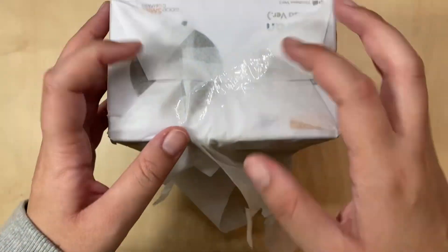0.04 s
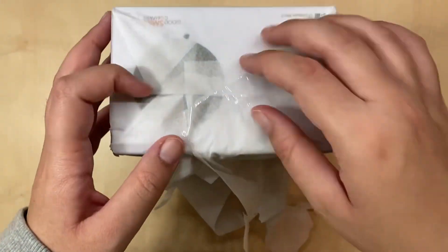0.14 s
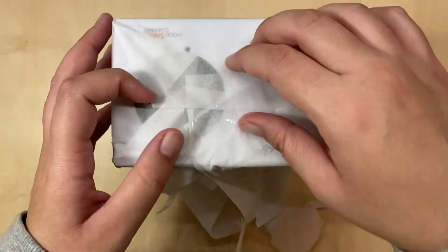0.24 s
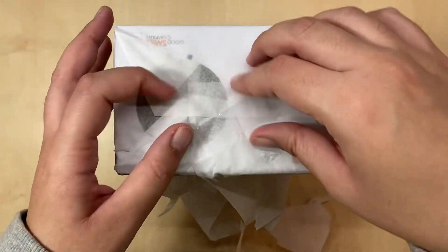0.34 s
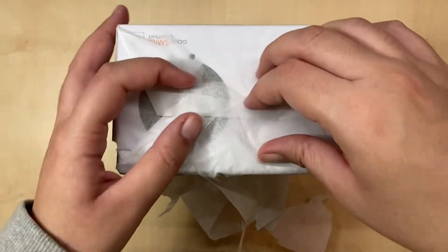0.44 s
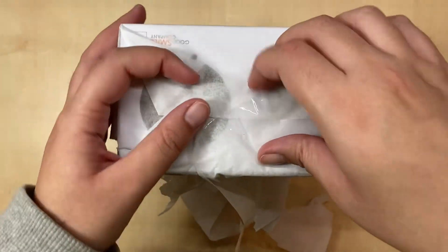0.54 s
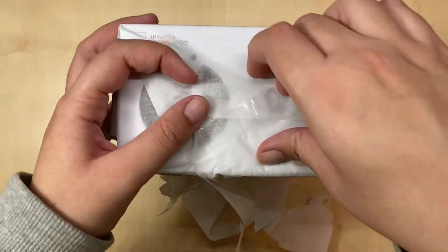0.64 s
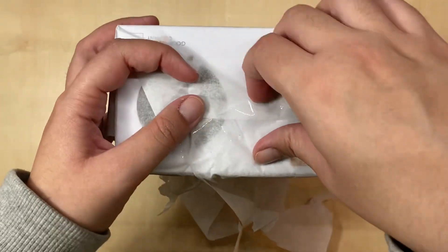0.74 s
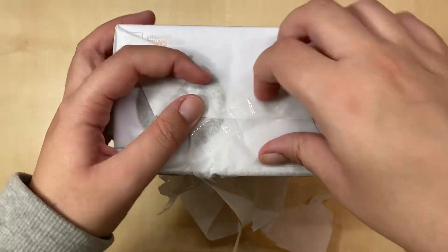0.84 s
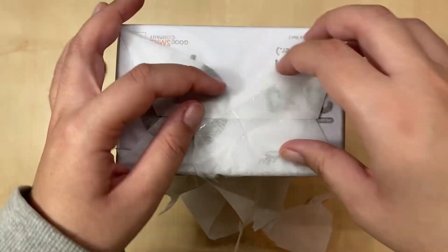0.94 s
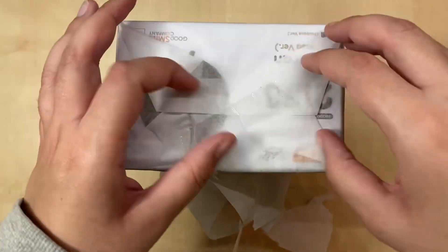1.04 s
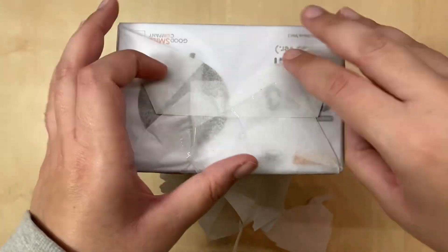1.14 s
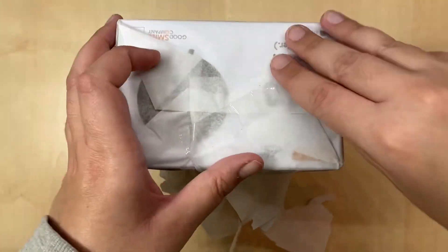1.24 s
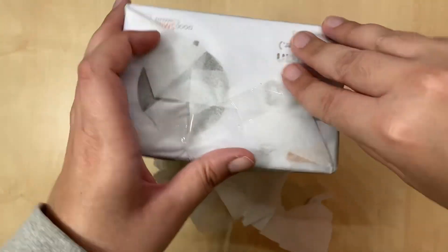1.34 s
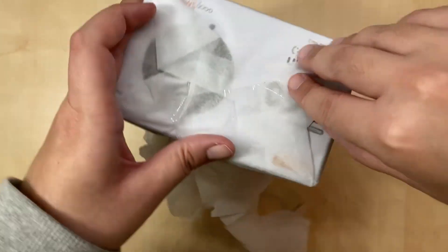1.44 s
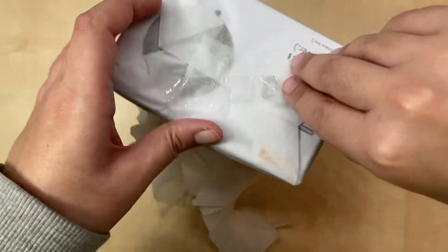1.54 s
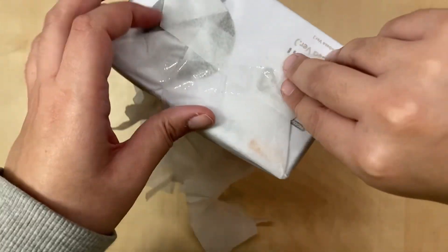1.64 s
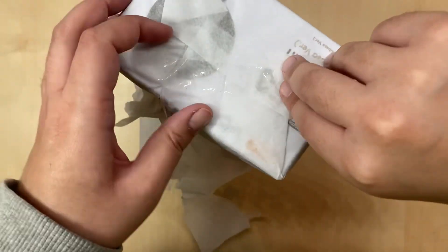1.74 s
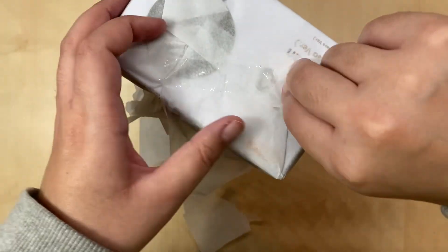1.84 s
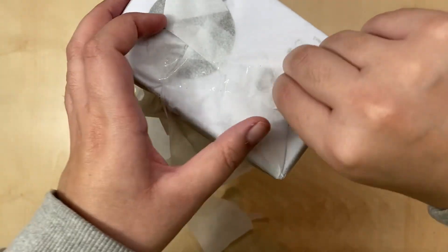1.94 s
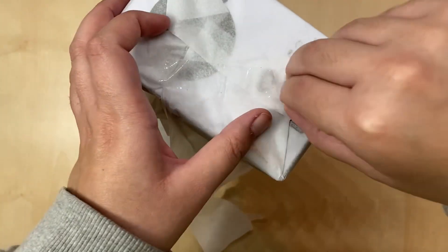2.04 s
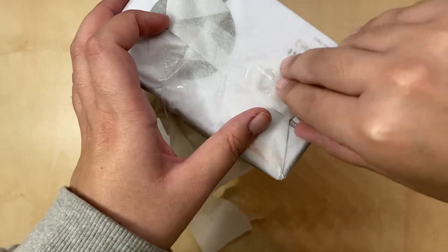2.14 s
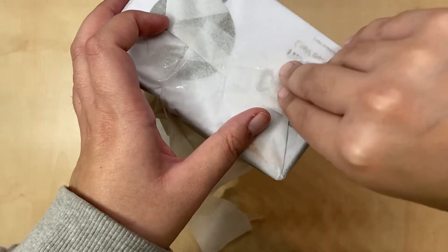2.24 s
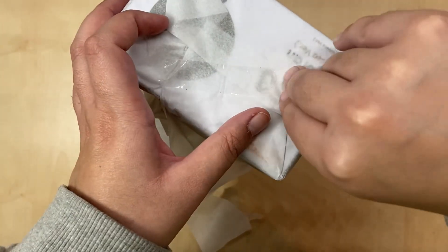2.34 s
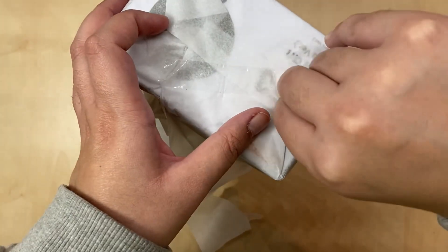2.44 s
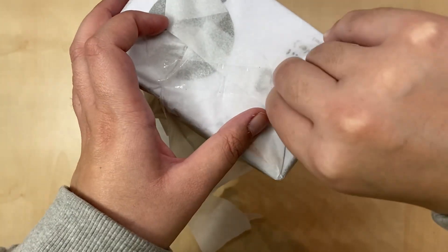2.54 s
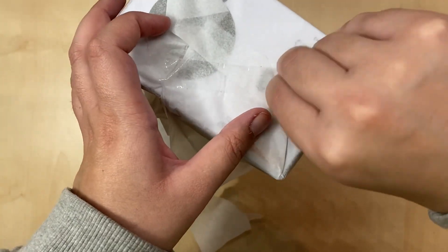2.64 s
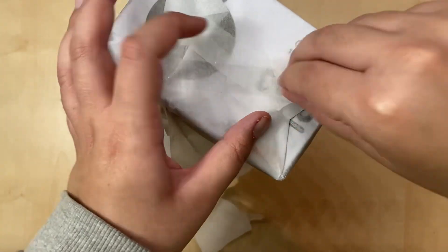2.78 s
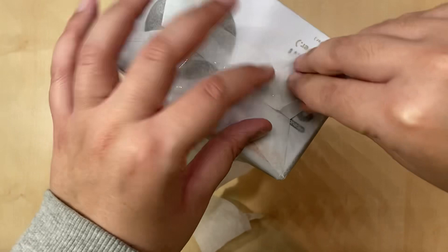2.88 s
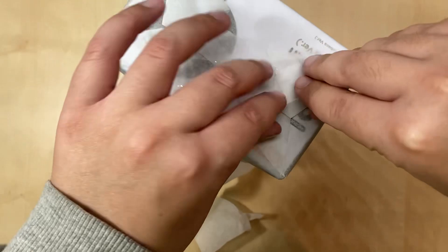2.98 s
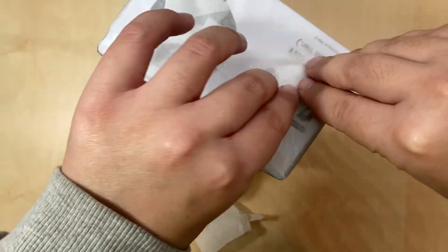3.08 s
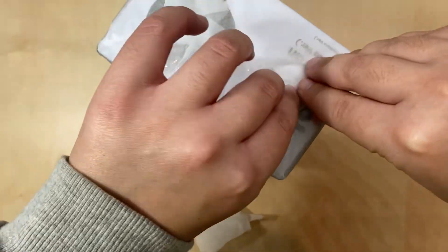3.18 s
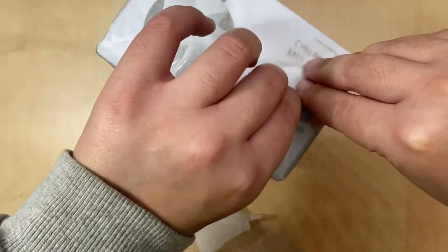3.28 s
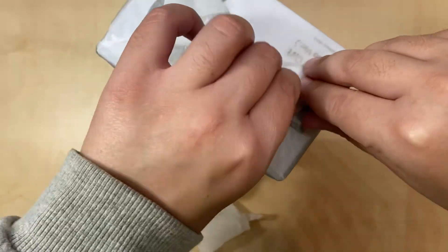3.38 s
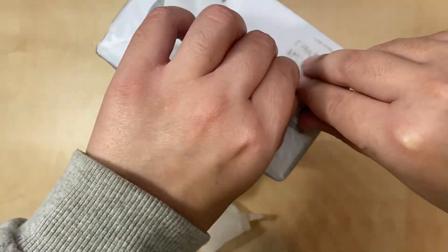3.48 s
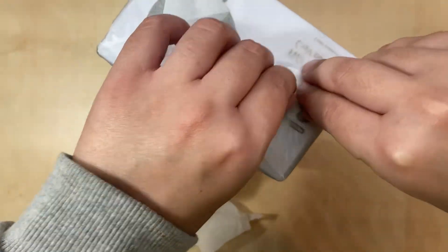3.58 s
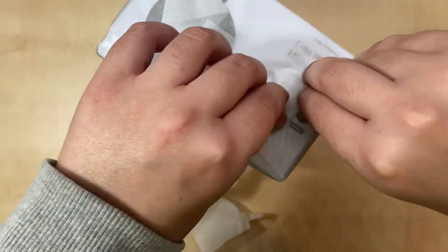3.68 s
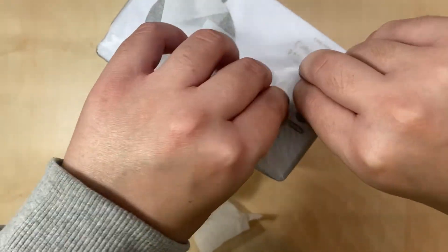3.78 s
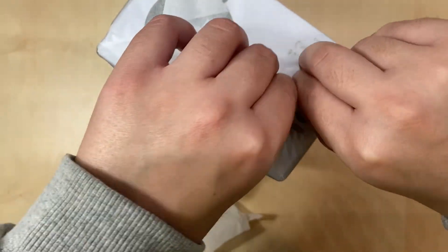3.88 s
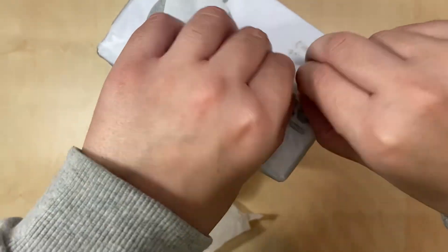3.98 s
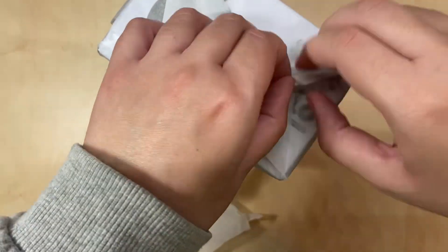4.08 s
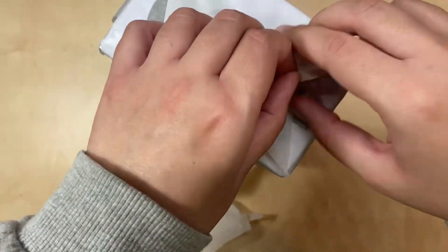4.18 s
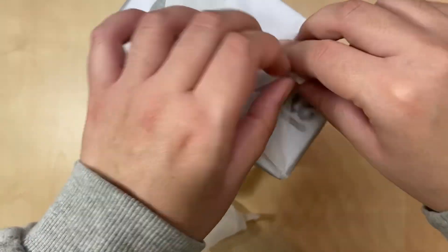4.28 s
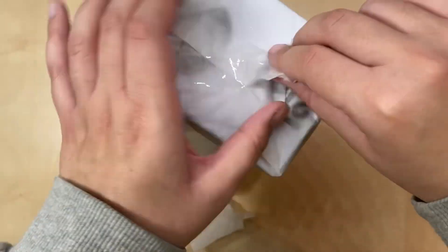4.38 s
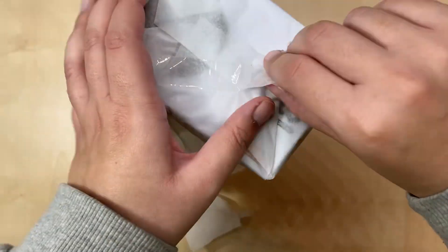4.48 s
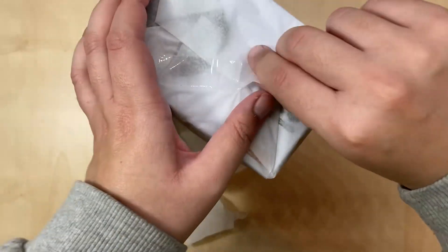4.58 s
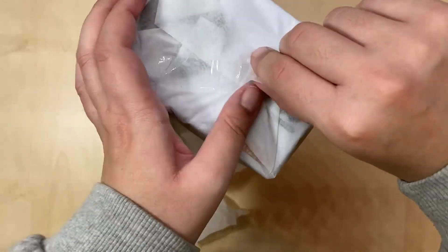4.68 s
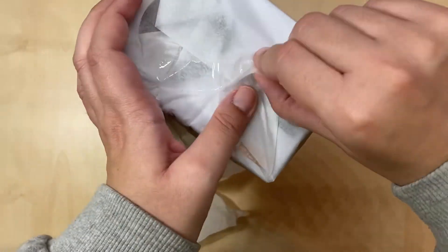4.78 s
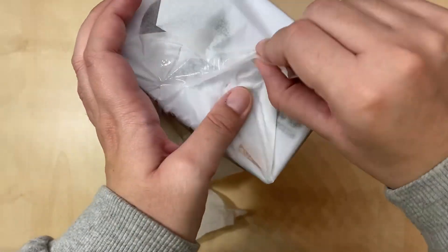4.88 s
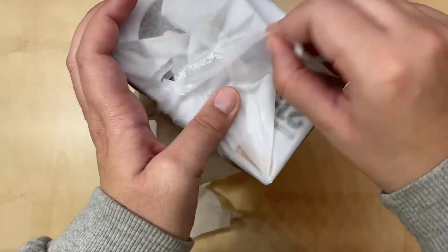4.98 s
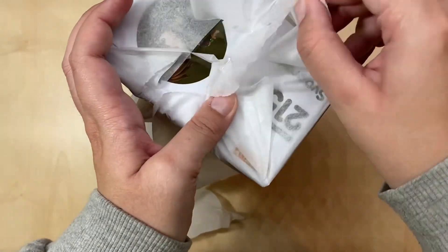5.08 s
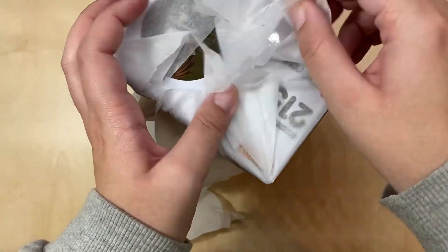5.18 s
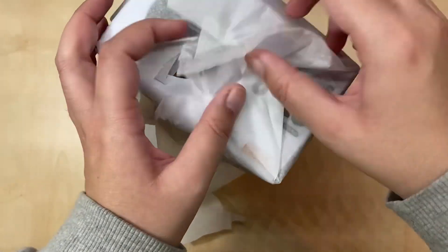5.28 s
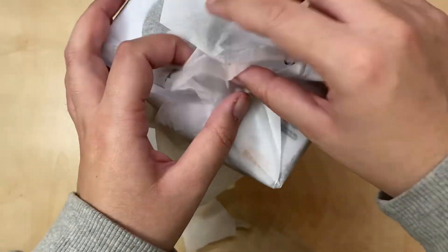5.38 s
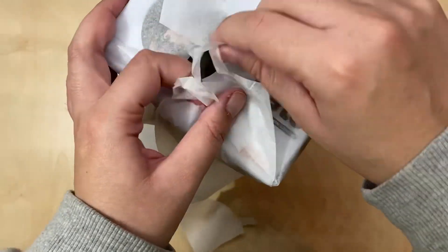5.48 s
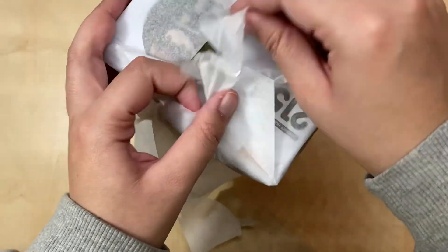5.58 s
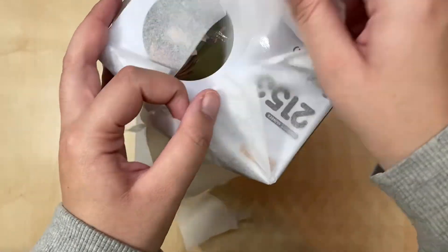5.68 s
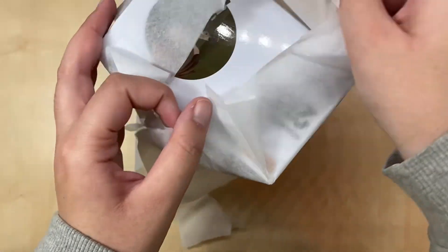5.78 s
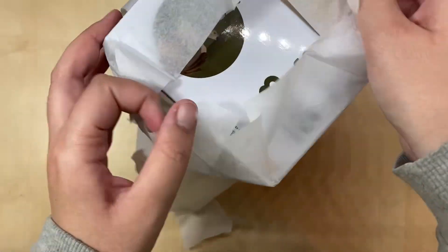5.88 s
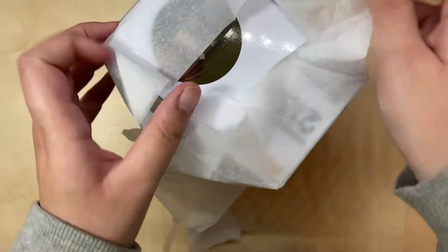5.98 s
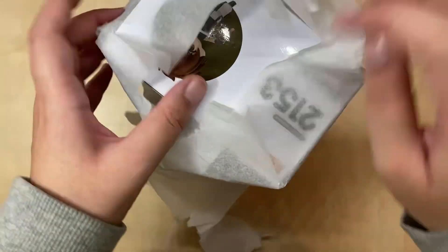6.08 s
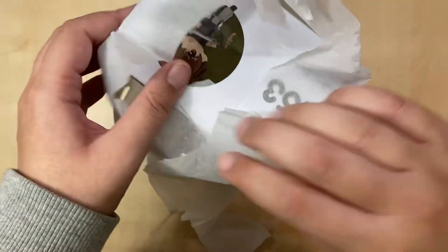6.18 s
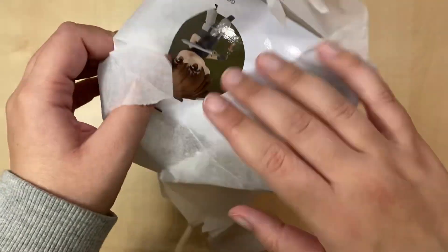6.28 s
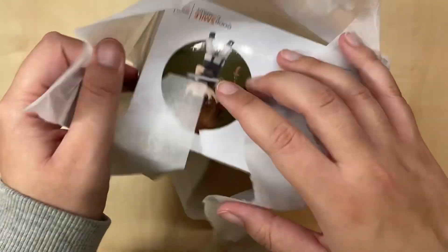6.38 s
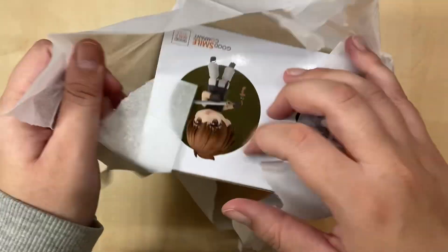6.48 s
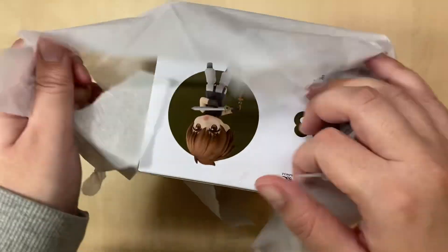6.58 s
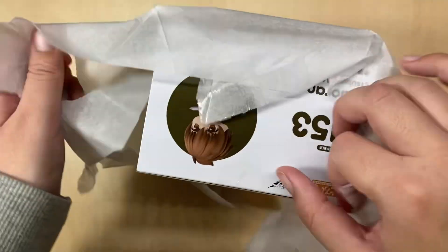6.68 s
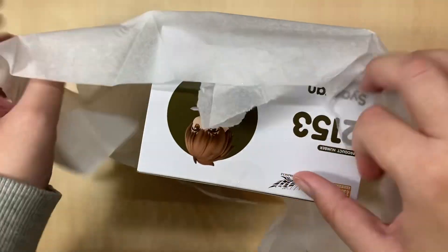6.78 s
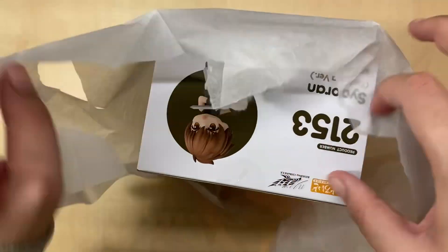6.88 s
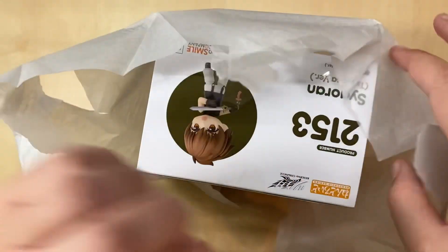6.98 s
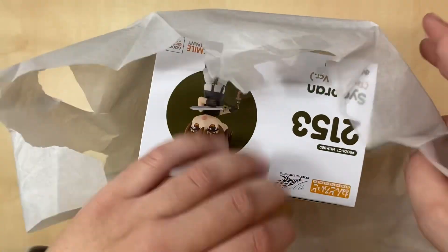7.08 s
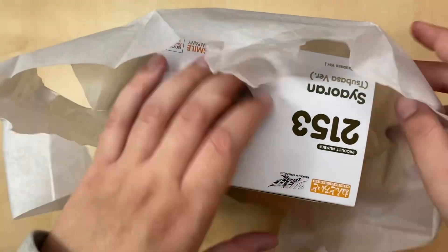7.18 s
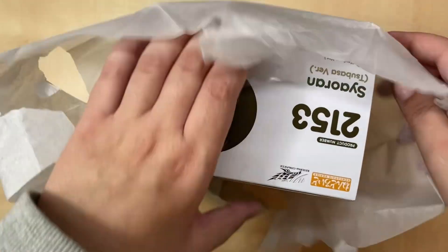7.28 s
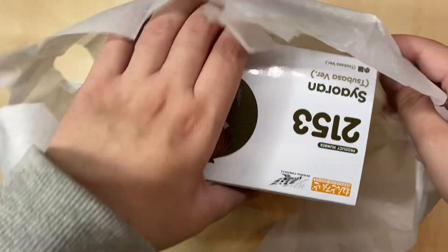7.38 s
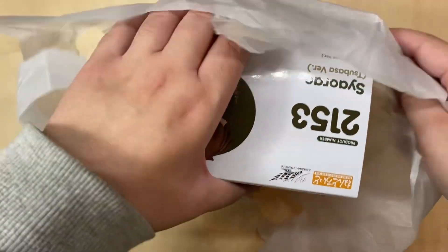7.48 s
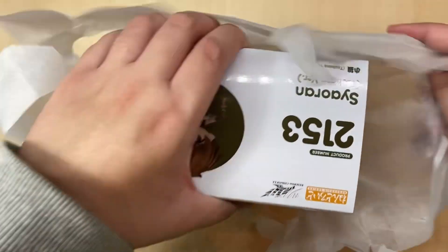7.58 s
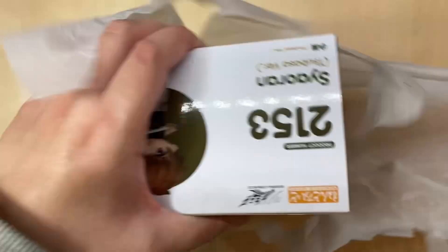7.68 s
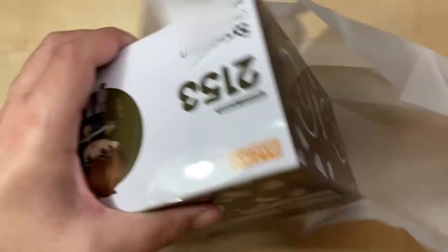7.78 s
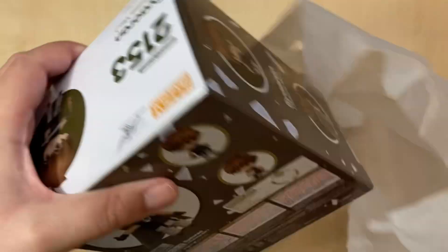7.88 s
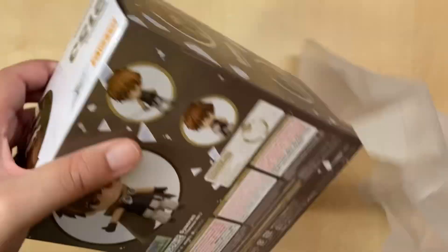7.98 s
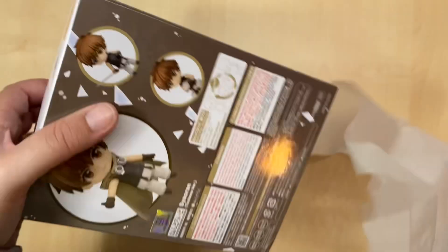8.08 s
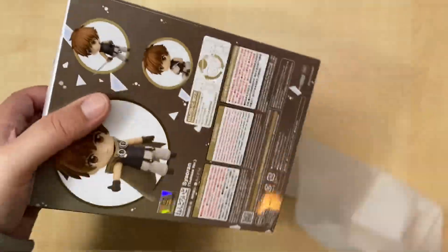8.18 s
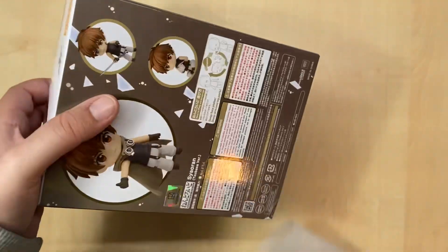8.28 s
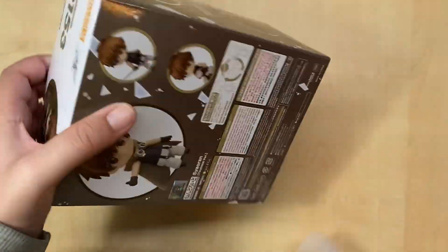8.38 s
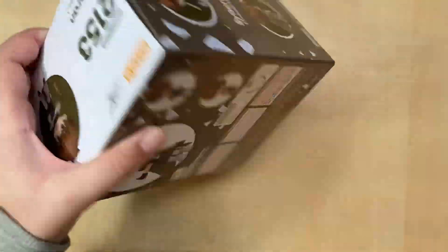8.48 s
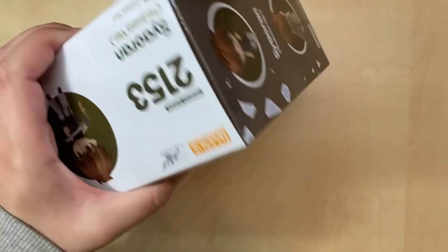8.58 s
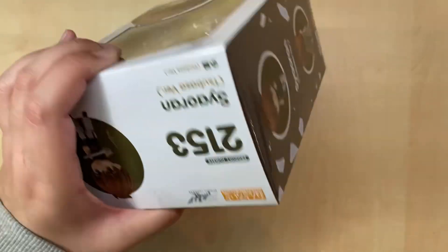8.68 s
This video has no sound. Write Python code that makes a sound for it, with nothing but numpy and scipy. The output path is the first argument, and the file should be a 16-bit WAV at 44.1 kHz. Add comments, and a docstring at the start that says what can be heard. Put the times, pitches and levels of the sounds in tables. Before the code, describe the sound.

Close up on a table in a small, fairly dry room, hands pick at thin paper and tape around a light cardboard box. Small snaps and hollow knocks come first, then quieter fiddling. Sudden hard snaps and a bright rip follow, then continuous tearing and crumpling, growing louder, ending with box knocks and dull table thumps. Stereo handheld microphone, very near.

```python
"""Hands pick at tape and paper with light snaps and knocks, ease off from about 2 s, then rip from 4.4 s.
Hard snaps crowd in just before 5 s; crumpling swells after 6.5 s, with box knocks and table thumps near the end.
Paper is noise shaped by crease bursts, pulls and snaps, plus ringing pops; box and table are struck or
rubbed modes. Room tone and a short tail lie below; two close ports of a handheld recorder pick it all up."""
import sys
import numpy as np
from scipy import signal
from scipy.fft import rfft, irfft, next_fast_len
from scipy.io import wavfile
from scipy.ndimage import uniform_filter1d

SR = 44100
rng = np.random.default_rng(int(sys.argv[2]) if len(sys.argv) > 2 else 0)


def inscribe(sig):
    """Save sig as 16-bit PCM at rate SR to the path in sys.argv[1].

    A 1-D sig is mono; a 2-D sig holds one channel per row.
    Samples are clipped to [-1, 1] before scaling.
    """
    pcm = np.round(np.clip(np.atleast_2d(sig).T, -1, 1) * 32767)
    wavfile.write(sys.argv[1], SR, pcm.astype(np.int16))


N = 384993


def amp(db):
    """Amplitude from dB."""
    return 10 ** (np.asarray(db) / 20)


def rms_one(x):
    """Scale to rms 1."""
    return x / np.sqrt(np.mean(x ** 2) + 1e-20)


def evened(x):
    """Hold the running rms over 1/8 s at 1."""
    return x / np.sqrt(uniform_filter1d(x ** 2, size=SR // 8) + 1e-12)


def in_time(rows):
    """Interpolate each column of a table over t, per sample."""
    s, *columns = np.transpose(rows)
    return [np.interp(np.arange(N) / SR, s, column) for column in columns]


def at_hz(points, hz):
    """Interpolate a two-column table over log frequency."""
    table_hz, values = np.transpose(points)
    return np.interp(np.log(hz), np.log(table_hz), values)


def bins_hz(size):
    """Frequencies of the rfft bins, at least 1 Hz."""
    return np.maximum(np.arange(size // 2 + 1) * SR / size, 1)


def highpass(x, hz):
    """Second-order Butterworth high-pass."""
    return signal.sosfilt(signal.butter(2, hz, "high", fs=SR, output="sos"), x)


def decayed(x, ms):
    """Exponential decay with time constant ms after each impulse."""
    return signal.lfilter([1], [1, -np.exp(-1000 / (ms * SR))], x + 1e-18)


def delayed(paths, late):
    """Read each path at fractional sample positions."""
    return np.array([np.interp(late, np.arange(N), path) for path in paths])


def coloured(x, spectrum):
    """Filter by a (f/Hz, gain/dB) table."""
    size = next_fast_len(N + 4096)
    return irfft(rfft(x, size) * amp(at_hz(spectrum, bins_hz(size))), size)[..., :N]


def drift(corner_hz):
    """Slow random signal of rms 1: noise through a double pole."""
    r = np.exp(-2 * np.pi * corner_hz / SR)
    noise = rng.standard_normal(N + SR)
    return rms_one(signal.lfilter([1], [1, -2 * r, r * r], noise)[SR:])


def ring(force, modes):
    """A force drives two-pole modes; panels radiate little below their lowest mode."""
    out = 0
    for hz, level_db, t60_s in modes:
        r, w = amp(-60 / (t60_s * SR)), 2 * np.pi * hz / SR
        b, a = [0, amp(level_db) * np.sin(w)], [1, -2 * r * np.cos(w), r * r]
        out = out + signal.lfilter(b, a, force + 1e-18)
    return highpass(out, 0.46 * modes[0][0])


def strokes(steady_db, start_s, length_s, level_db, swell_db, rise_db_per_s, fall_db_per_s):
    """Level/dB of strokes that rise, swell or sag, then fall; powers add to a steady level."""
    start, length, level, swell = (np.asarray(x)[:, None] for x in (start_s, length_s, level_db, swell_db))
    t = np.arange(0, N + 64, 32) / SR
    held_db = swell * np.clip((t - start) / length, 0, 1)
    before_db = np.maximum(rise_db_per_s * (start - t), 0)
    after_db = np.maximum(fall_db_per_s * (t - start - length), 0)
    power = np.sum(amp(2 * (level + held_db - before_db - after_db)), axis=0)
    power = np.interp(np.arange(N) / SR, t, power)
    return 10 * np.log10(power + amp(2 * steady_db))


# room tone spectrum: f/Hz, relative level per Hz/dB
AIR_SPECTRUM = [(20, -38), (45, 37.5), (80, 31.5), (200, -35), (600, -26), (2000, -65)]
AIR_DB = -61.5


def air():
    """Room tone: steady coloured noise, independent in three paths."""
    return amp(AIR_DB) * rms_one(coloured(rng.standard_normal((3, N)), AIR_SPECTRUM))


ROOM_T60_S, ROOM_DB = 0.16, -10.5


def room(x):
    """Short reverberation: each path convolved with its own decaying noise tail."""
    t = np.arange(SR // 2) / SR
    tail = rng.standard_normal((3, len(t))) * amp(-60 * t / ROOM_T60_S) * (t > .006)
    tail = signal.lfilter([1], [1, -.6], tail)
    tail = tail / np.sqrt(np.sum(tail ** 2, 1, keepdims=True))
    return amp(ROOM_DB) * signal.fftconvolve(x, tail, axes=1)[:, :N]


# hand activity, as steady rustle: t/s, level/dB
HANDS_LEVEL = [(0, -45.5), (.3, -58), (.78, -52.5), (1.15, -56.5), (1.6, -50), (1.95, -55.5), (2.5, -57.5),
               (2.95, -62.5), (3.45, -65), (3.96, -63), (4.1, -55), (4.7, -41), (5.15, -40.5), (6.1, -40.5),
               (6.6, -34.5), (6.82, -40), (7.0, -41), (7.5, -37.5), (8.0, -32), (8.73, -32)]


def hands():
    """Level/dB of the rustle that never stops."""
    return in_time(HANDS_LEVEL)[0]


GRIP_DETUNE_SHARE, GRIP_DB = 0.042, 4   # changing grip shifts the pitch of struck modes, mutes rubbed ones


def rubbed(modes, level_db, rough_db):
    """Uneven friction drives the modes, each coming and going with the grip."""
    force = rng.standard_normal((3, N)) * amp(rough_db * drift(34))
    driven = 0
    for mode in modes:
        grip_db = GRIP_DB * np.tanh(drift(3.5))
        driven = driven + ring(amp(level_db + grip_db) * force, [mode])
    return driven / np.std(ring(force[0], modes))


# box panels, stiff box edges, table top; each: f/Hz, relative level/dB, free t60/s
BOX_MODES = [(300, -7, 0.04), (352, -3, 0.05), (398, 2, 0.06), (482, -15, 0.015), (558, -15, 0.05)]
EDGE_MODES = [(826, -5, 0.015), (1038, 5, 0.047), (1316, 7.5, 0.017), (1720, 8.5, 0.015), (2300, 6, 0.014)]
TABLE_MODES = [(60, -11, .05), (88, -10, .06), (118.5, 0, .23)]
# box shoved or pressed on the table: start t/s, length/s, box level/dB, table level/dB
SHOVE_STROKES = [(0.189, 0.017, -45.5, -55), (0.37, 0.09, -50.5, -66), (0.458, 0.074, -48, -50),
                 (0.69, 0.021, -44.5, -66), (1.22, 0.16, -60.5, -61), (2.248, 0.37, -61.5, -54.5),
                 (3.039, 0.3, -58.5, -64.5), (3.51, 0.081, -55, -64), (3.692, 0.26, -57, -63),
                 (4.027, 0.27, -55.5, -77), (4.252, 0.063, -47.5, -72), (4.766, 0.042, -45.5, -47),
                 (4.865, 0.11, -49, -52), (4.96, 0.1, -42, -59), (5.36, 0.041, -50, -71),
                 (5.693, 0.0086, -41.5, -51), (6.33, 0.15, -48, -45.5), (6.935, 0.017, -49, -47.5),
                 (7.545, 0.13, -53, -44.5), (7.94, 0.071, -72, -46), (8.104, 0.13, -50, -45),
                 (8.438, 0.029, -35.5, -41), (8.56, 0.13, -73, -51)]
SHOVE_RISE_DB_PER_S, SHOVE_FALL_DB_PER_S = 400, 252
# faint steady motion: levels with the hands at -50 dB, share of the hands' swing in dB
BOX_STIR_DB, TABLE_STIR_DB, STIR_FOLLOWS = -61, -62.5, 0.67
EDGES_RE_BOX_DB = -9.5
PRESSED_RING_SHARE = .45   # share of free t60 left under the weight of the hands


def shoves():
    """Friction rings box, edges and table, faintly all along and harder in each shove."""
    start_s, length_s, box_stroke_db, table_stroke_db = np.transpose(SHOVE_STROKES)
    stir_db = STIR_FOLLOWS * (hands() + 50)
    flat_db = np.zeros_like(start_s)
    rates = SHOVE_RISE_DB_PER_S, SHOVE_FALL_DB_PER_S
    box_db = strokes(BOX_STIR_DB + stir_db, start_s, length_s, box_stroke_db, flat_db, *rates)
    table_db = strokes(TABLE_STIR_DB + stir_db, start_s, length_s, table_stroke_db, flat_db, *rates)
    pressed_table = [(hz, db, t60_s * PRESSED_RING_SHARE) for hz, db, t60_s in TABLE_MODES]
    box = rubbed(BOX_MODES, box_db, rough_db=4.0)
    edges = rubbed(EDGE_MODES, box_db + EDGES_RE_BOX_DB, rough_db=-0.5)
    return box + edges + rubbed(pressed_table, table_db, rough_db=6.0)


# fingers and box corners: t/s, level/dB, table re level/dB, edges re level/dB; each part trimmed in knocks()
KNOCK_HITS = [(0.058, -27, -15, -22), (0.186, -33, -2, -19), (0.191, -28, -12, -10),
              (0.374, -34, -27, -16.5), (0.445, -28, -26, -44), (0.46, -36.5, -6, -14),
              (0.478, -34, -2, -34), (0.494, -43, -3, -8.5), (0.509, -29.5, -24, -35),
              (0.527, -42, -18, -9), (0.648, -21.5, -24, -23.5), (0.702, -24, -42, -15.5),
              (0.735, -29, -35, -37), (1.09, -35.5, -28, -24), (1.107, -45, -17, -4),
              (1.264, -30, -17, -31), (2.119, -39.5, -36, -23), (2.392, -37, -26, -13.5),
              (3.501, -46, -12, -17), (3.689, -38.5, -11, -28), (4.755, -30, -22, -38),
              (4.766, -21, -22, -42), (4.82, -40, 8, -25), (4.864, -24, -14, -24), (4.879, -41, 11, -25),
              (4.931, -42, -10, -8), (4.967, -33, -18, -13), (4.983, -31, 3.5, -15), (5.354, -39, -18, -32),
              (5.39, -45, -21, -30), (5.629, -36, -10, -24), (5.749, -23, -25, -15),
              (5.779, -25.5, -17, -12), (5.897, -34, -14, -22), (6.317, -28, -24, -26),
              (6.487, -28, -16, -16), (7.333, -28, -24, -36), (7.555, -42, -4, -15), (7.967, -47, 7, -27),
              (8.026, -40, -11, -24), (8.102, -34, 0, -19), (8.133, -43, 10, -23), (8.219, -25, -3, -12),
              (8.249, -38.5, 10, -23), (8.304, -43.5, 9.5, -14), (8.383, -41, 7, -9),
              (8.438, -22.5, -3, -18), (8.4456, -33.5, 16.5, -20), (8.671, -50, 12, -23)]
HELD_RING_SHARE = 0.99   # share of free t60 left to a box held in the fingers


def struck(modes, start_s, level_db, contact_ms, vary_db, held):
    """Each hit rings decaying sines of varied strength, smoothed by contact time; held modes also detune."""
    t = np.arange(SR // 4) / SR
    hz, mode_db, t60_s = np.transpose(modes)[:, :, None]
    decay_db = -60 * t / (t60_s * (HELD_RING_SHARE if held else 1))
    rung = np.zeros(N + len(t))
    chance = rng.standard_normal((len(start_s), 2, len(modes), 1))
    for start, hit_db, (strength, tuning) in zip((start_s * SR).astype(int), level_db, chance):
        tuned_hz = hz * (1 + held * GRIP_DETUNE_SHARE * tuning)
        size = amp(hit_db + mode_db + vary_db * strength + decay_db)
        rung[start:start + len(t)] += np.sum(size * np.sin(2 * np.pi * tuned_hz * t), axis=0)
    contact = np.hanning(round(contact_ms * SR / 1000) + 3)
    rung = signal.lfilter(contact / contact.sum(), [1], rung[:N])
    return highpass(rung, 0.9 * modes[0][0])


def knocks():
    """Each knock pushes box, edges and table; the table is loaded most slowly."""
    s, level_db, table_db, edge_db = np.transpose(KNOCK_HITS)
    box = struck(BOX_MODES, s, level_db - 7.5, contact_ms=2.5, vary_db=2.5, held=True)
    edges = struck(EDGE_MODES, s, level_db + edge_db + 0.5, contact_ms=.6, vary_db=3.0, held=True)
    table = struck(TABLE_MODES, s, level_db + table_db + 4.0, contact_ms=9.5, vary_db=.4, held=False)
    return box + edges + table


# timed pops of taut creases: t/s, f/Hz, drive level/dB
TIMED_POPS = [(0.453, 2450, -38), (1.828, 2360, -43), (5.555, 2600, -28), (7.063, 3280, -38),
              (7.082, 5600, -32), (7.114, 4040, -44), (7.675, 3200, -26), (7.825, 3220, -30),
              (5.601, 1610, -33), (5.626, 2470, -31), (6.4, 3280, -30), (6.529, 1540, -31)]
POPS_PER_S, POP_CYCLES, POP_RE_PAPER_DB = 400, 28, -13.5   # small pops: median rate, cycles per t60, rms


def pops(paper_db):
    """Taut patches ring for some cycles: random pops over three octaves, and longer-ringing timed ones."""
    sizes = amp(1.55 * np.minimum(rng.exponential(1, N), 4.0)) * rng.choice([-1, 1], N)
    born = rng.random(N) < POPS_PER_S * amp(5.0 * drift(12)) / SR
    dealt = rng.integers(0, 16, N)
    out = 0
    for k, hz in enumerate(np.geomspace(1000, 8000, 16)):
        rung = ring(sizes * born * (dealt == k), [(hz, 0, POP_CYCLES / hz)])
        out = out + rung * (hz / 3000) ** 0.86
    out = amp(paper_db + POP_RE_PAPER_DB) * rms_one(out)
    for s, hz, level_db in TIMED_POPS:
        impulse = amp(level_db) * (np.arange(N) == int(s * SR))
        out = out + ring(impulse, [(hz, 0, 2 * POP_CYCLES / hz)])
    return out


# snaps of fibres and tape: t/s, level/dB, dull part re level/dB (before a trim in snaps())
SNAP_EVENTS = [(0.115, -38.5, 6), (0.231, -39, -5), (0.38, -32.5, -32), (0.459, -37, -17),
               (0.573, -33.5, -29), (0.656, -29, -19), (0.799, -40, -27), (0.88, -35, -14),
               (0.895, -31, -31), (0.9384, -37, -30), (1.038, -38, -24), (1.207, -33.5, -6),
               (1.3135, -48, -23), (1.387, -34, -25), (1.397, -31.5, -5), (1.494, -32.5, -11),
               (1.543, -46, -4), (1.5986, -28, -15), (1.648, -40, -25), (1.6574, -39, -29),
               (1.719, -27, -12), (1.775, -40, -21), (1.852, -39, -25), (1.936, -37, -14), (2.032, -32, -2),
               (2.107, -35, -6.5), (2.218, -37, -29), (2.2802, -35.5, -32), (2.318, -37, -32),
               (2.392, -50, 9), (2.702, -45, -25), (2.812, -43, -6), (2.864, -43, -6), (2.916, -45, -28),
               (3.039, -36, -5), (3.149, -35.5, -5.5), (3.281, -40.5, -19), (3.4164, -43, -13),
               (3.501, -41.5, 4), (3.7456, -41.5, -8), (4.036, -37, -23), (4.2033, -37, -28),
               (4.4052, -25.5, -7), (4.4329, -20.5, -8), (4.542, -27, -31), (4.625, -35, -29),
               (4.764, -21, -22), (4.788, -20, -13), (4.792, -8, -8.5), (4.8056, -9.5, -3.5),
               (4.8115, -18.5, -1), (4.8625, -10, -3.5), (4.867, -13.5, 1.5), (4.903, -19, -1),
               (4.924, -21, -2), (4.938, -21, -1), (4.9574, -22, -15), (4.968, -13, -22), (4.99, -14, -14),
               (5.148, -36, -13), (5.197, -39.5, 6), (5.21, -33, 5), (5.4081, -36, -27), (5.417, -27, -28),
               (5.453, -20.5, -3.5), (5.584, -27, -10), (5.7448, -21, -21), (5.777, -14.5, -9),
               (5.89, -22, -3), (6.2171, -25.5, 3), (6.2567, -34.5, 6), (6.313, -21, 2.5),
               (6.486, -23.5, 3.5), (6.752, -35, -5), (6.9676, -37, 3), (7.0786, -26.5, 3),
               (7.265, -41, -25), (7.2812, -24.5, 4), (7.389, -25.5, 2), (7.557, -13.5, -14),
               (7.568, -21, -3), (8.077, -26, 4), (8.091, -21, -17)]
SNAP_LEAD_MS = 1.0   # break after table t
SNAP_MS, SNAP_RISE_MS, SNAP_TAIL_MS, SNAP_TAIL_DB = 0.25, 1.2, 3.2, -7   # time constants; swell and tail gain
AFTER_MS, AFTER_DB = 6, -13   # neighbouring fibres: spread either way about a mean lag of half that, mean level
SNAP_CLICK_DB = -3


def snaps():
    """Envelopes, bright then dull: each snap swells briefly, peaks in a spike, dies away; neighbours give around it."""
    s, level_db, dull_db = np.transpose(SNAP_EVENTS)
    parts_db = np.array([level_db, level_db + dull_db + 5.0])
    hits, chance = np.zeros((2, N)), rng.uniform(-1, 1, (len(s), 6))
    hits[:, ((s + SNAP_LEAD_MS / 1000) * SR).astype(int)] = amp(parts_db)
    for when, size in zip(chance[:, :3].T, chance[:, 3:].T):
        near_s = s + AFTER_MS * (when + .5) / 1000
        hits[:, (near_s * SR).astype(int)] += amp(parts_db + AFTER_DB + 4 * size)
    swell = decayed(hits[:, ::-1], SNAP_RISE_MS)[:, ::-1] - hits   # time-reversed decay
    return decayed(hits, SNAP_MS) + amp(SNAP_TAIL_DB) * (swell + decayed(hits, SNAP_TAIL_MS))


def breaks():
    """Clean click at the heart of each snap: a high-passed impulse of random sign."""
    s, level_db, _ = np.transpose(SNAP_EVENTS)
    clicks = np.zeros(N)
    signs = np.sign(rng.standard_normal(len(s)))
    clicks[((s + SNAP_LEAD_MS / 1000) * SR).astype(int)] = amp(level_db + SNAP_CLICK_DB) * signs
    return highpass(clicks + 1e-18, 2500)


# pulls, rips, squeezes: start t/s, length/s, start level/dB, swell to end/dB, low part re level/dB
PULL_STROKES = [(0.161, 0.21, -37, -7.5, -19), (0.345, 0.16, -41.5, -1.5, -23), (0.528, 0.21, -46, 0, -6.5),
                (0.844, 0.2, -44.5, -6, -7), (1.084, 0.052, -42.5, 0.5, -7),
                (1.203, 0.35, -42.5, -1.5, -11.5), (1.638, 0.15, -47.5, 5.5, -11.5),
                (1.79, 0.1, -54.5, 4.5, -8), (2.177, 0.2, -53.5, -27, 11), (2.657, 0.06, -50.5, 4, -20),
                (3.128, 0.2, -52.5, -5.5, -13), (3.375, 0.093, -53.5, -11, -6),
                (3.52, 0.48, -52, -18, -0.5), (3.817, 0.15, -54, -2, -22), (4.01, 0.14, -42, 3.5, -11.5),
                (4.138, 0.2, -41.5, 6, -16), (4.412, 0.042, -46.5, 0.5, -1.5), (4.51, 0.2, -41, -14, -27),
                (4.752, 0.032, -35.5, 9, -17.5), (4.852, 0.077, -35, -20, -16),
                (4.971, 0.11, -18.5, -5.5, -9.5), (5.206, 0.059, -38, 0.5, -13),
                (5.357, 0.15, -37, 7.5, -23), (5.553, 0.13, -29, 5, -11.5), (5.741, 0.023, -32, 2, 0.5),
                (5.891, 0.096, -36, -13.5, -1.5), (6.083, 0.066, -44, 8, -5), (6.234, 0.028, -37, -19, -6),
                (6.305, 0.12, -31.5, 0.5, -7), (6.473, 0.18, -36, -3, -2.5), (6.69, 0.069, -35.5, 7, -7.5),
                (6.908, 0.048, -33, -2.5, -6), (7.119, 0.032, -33.5, -6, -4.5),
                (7.217, 0.016, -35.5, 4, -2.5), (7.274, 0.21, -35.5, 5.5, -3.5),
                (7.523, 0.052, -32.5, 8.5, -4), (7.581, 0.18, -28, -3.5, -5), (7.783, 0.054, -31, 3, -8.5),
                (8.106, 0.2, -27.5, -0.5, -3.5), (8.36, 0.023, -23.5, -8, -8), (8.41, 0.056, -32, 6, -6.5),
                (8.503, .2, -47, -12, 14.5)]
PULL_RISE_DB_PER_S, PULL_FALL_DB_PER_S = 700, 800
RUSTLE_BODY_DB = -9   # low part of the steady rustle re its level


def pulls():
    """Level/dB of the paper, and of its low part re that: strokes over the steady rustle."""
    start_s, length_s, level_db, swell_db, low_db = np.transpose(PULL_STROKES)
    hands_db = hands()
    rates = PULL_RISE_DB_PER_S, PULL_FALL_DB_PER_S
    paper_db = strokes(hands_db, start_s, length_s, level_db, swell_db, *rates)
    body_db = strokes(hands_db + RUSTLE_BODY_DB, start_s, length_s, level_db + low_db, swell_db, *rates)
    return paper_db, body_db - paper_db


CREASES_PER_S, CREASE_SPREAD_DB, CREASE_OCTAVES = 1200, 6, 0.72   # median rate, mean size boost uncapped, sigma
CREASE_MS_AT_4KHZ, CREASE_RISE_RE_DECAY = 1, .9


def creases(edges_hz, crease_db):
    """Band envelopes of buckling creases: clumped bursts, each with its own pitch, over sliding sheets."""
    sizes = amp(CREASE_SPREAD_DB * np.minimum(rng.exponential(1, N), 3.0))
    born = rng.random(N) < CREASES_PER_S * amp(6.0 * np.tanh(drift(25))) / SR
    octave = rng.uniform(np.log2(edges_hz[0]), np.log2(edges_hz[-1]), N)
    surge = drift(3.4)
    crisp = amp(crease_db)
    for low_hz in edges_hz[:-1]:
        near = np.exp(-.5 * ((octave - np.log2(low_hz)) / CREASE_OCTAVES) ** 2)
        ms = CREASE_MS_AT_4KHZ * (4000 / low_hz) ** 0.78   # large creases sound low and last longer
        bursts = decayed(sizes * born * near, ms)
        bursts = uniform_filter1d(bursts, size=max(round(CREASE_RISE_RE_DECAY * ms * SR / 1000), 1))
        gust_db = 8.7 * np.tanh(surge) + 5.4 * np.tanh(drift(33.0))
        gusts = amp(np.minimum(crisp, 1) * gust_db)   # sliding sheets hiss evenly, crumpling ones gust
        yield evened((crisp * rms_one(bursts) + 1) * gusts)


SHEET_MS, SHEET_SWING_MS, SHEET_SHARE = .9, 0.32, 0.22   # longer echo's mean lag and swing; level of each


def fluttered(x):
    """Echoes off loose sheets at two wandering lags lay moving ridges and hollows across the rustle."""
    for ms in (SHEET_MS, SHEET_MS / 3):
        lag_ms = ms * (1 + SHEET_SWING_MS / SHEET_MS * np.tanh(drift(3.07)))
        echo = delayed(x, np.arange(N) - lag_ms * SR / 1000)
        x = (x + SHEET_SHARE * echo) / np.sqrt(1 + SHEET_SHARE ** 2)
    return x


# echo off table and box: t/s, hollow f/Hz, echo share of direct amplitude
HOLLOW_ECHO = [(0, 1550, 0.22), (3, 1430, 0.022), (5.3, 1280, 0.081), (5.6, 1240, 0.059), (6.8, 1920, 0.16),
               (7.0, 2050, 0.38), (7.3, 2000, 0.42), (7.6, 1630, 0.25), (7.85, 1450, 0.084),
               (8.1, 1570, 0.51), (8.2, 1790, 0.21), (8.3, 2100, 0.21), (8.73, 2280, 0.43)]
ECHO_CUT_HZ = 1860


def echoed(x):
    """A dull copy half a cycle of the hollow pitch late thins the rustle near that pitch."""
    hz, share = in_time(HOLLOW_ECHO)
    dull = signal.lfilter(*signal.butter(1, ECHO_CUT_HZ, fs=SR), x)
    filter_lag = SR / (2 * np.pi * ECHO_CUT_HZ)   # dulling takes some of the lag
    late = np.arange(N) - SR / (2 * hz) + filter_lag
    return (x + share * delayed(dull, late)) / np.sqrt(1 + share ** 2)


# paper colour: f/Hz, relative gain/dB
PAPER_SPECTRUM = [(150, -10), (500, -5.5), (1000, -4.5), (2000, -2.5), (3500, -1.5), (5500, 0), (7000, 3.5),
                  (9000, 1), (12000, 0), (15500, -2.5)]
# paper state: t/s, creases re slide of sheets/dB, middle pitches of the rustle/dB
PAPER_STATE = [(0, 2.5, 7.5), (.6, -4, -17), (1.5, -3, -1), (4.7, -0.5, -3), (5.0, -12, 1), (5.4, -9, 2.5),
               (5.62, -14.5, 4), (6.2, -4.5, 0.5), (7.0, -4.5, 4.5), (7.6, -16, 0.5), (8.0, -10, 3.5),
               (8.25, -29, -0.5), (8.73, -7, 6)]


def paper():
    """Noise in three paths (common, left, right) shares crease bursts and snaps by band; pops and clicks join."""
    paper_db, body_db = pulls()
    crease_db, middle_db = in_time(PAPER_STATE)
    bright, dull = snaps()
    edges_hz = 170 * 2 ** np.arange(0, 7, 2 / 3)
    white = rng.standard_normal((2, 3, N))   # neighbouring bands use unrelated noise
    out = 0
    for k, envelope in enumerate(creases(edges_hz, crease_db)):
        low_hz = edges_hz[k]
        body = 1 / (1 + (low_hz / 1600) ** 3)   # large loose sheets fill the low bands
        middle = np.exp(-np.log2(low_hz / 1700) ** 2 / 0.45)
        rustle = amp(paper_db + body * (body_db + 8.5) + middle * middle_db) * envelope
        crack = (dull if low_hz < 3000 else bright) * amp(-9 * body)
        band = signal.butter(2, edges_hz[k:k + 2], "band", fs=SR, output="sos")
        out = out + signal.sosfilt(band, (rustle + crack) * white[k % 2])
    rustling = fluttered(coloured(out, PAPER_SPECTRUM)) * amp(2.0)
    return echoed(rustling + pops(paper_db)) + breaks()


# the two ports: f/Hz, share of power common to both
PORT_LIKENESS = [(60, 0.99), (150, 0.83), (350, 0.99), (800, 0.13), (2500, 0.067), (5000, 0.53),
                 (6500, 0.14), (8300, 0.99), (16000, 1)]
# f/Hz, phase lead of left/rad; treble falls in and out of step about every 6 kHz
PORT_LEAD = [(100, 0), (800, -.6), (5000, -.8), (6300, .3), (7500, 1.7), (8300, 3.1), (9600, 3.2),
             (11300, 6.2), (13200, 6.3), (14400, 9.4), (16500, 9.5)]
# f/Hz, left minus right/dB
PORT_PAN = [(60, 2), (130, -2), (290, -1.5), (640, -1.5), (1410, -2), (3100, -3.5), (6820, -1.5),
            (15000, 1)]


def ports(paths):
    """Each port mixes the common path, shifted in phase, with a path of its own."""
    size = next_fast_len(N + 4096)
    hz = bins_hz(size)
    common, left, right = rfft(paths, size)
    alike = np.clip(at_hz(PORT_LIKENESS, hz), 0, 1)
    half_lead = np.exp(.5j * at_hz(PORT_LEAD, hz))
    half_pan = amp(at_hz(PORT_PAN, hz) / 2)
    shared, own = np.sqrt(alike) * common, np.sqrt(1 - alike)
    left = half_pan * (shared * half_lead + own * left)
    right = (shared / half_lead + own * right) / half_pan
    return irfft(np.array([left, right]), size)[:, :N]


def scene():
    """Sum the near sources, add room tail and room tone, pick up at two ports."""
    near = shoves() + knocks() + paper()
    return ports(near + room(near) + air())


CUTOFF_HZ = 16600   # stopband edge


def record(dry):
    """Deepest bass is lost, highest peaks are rounded, the top is cut steeply."""
    dry = signal.sosfilt(signal.butter(4, 42, "high", fs=SR, output="sos"), dry)
    rounded = .95 * np.tanh(dry / .95)
    return signal.sosfilt(signal.cheby2(16, 70, CUTOFF_HZ, fs=SR, output="sos"), rounded)


dry = scene()
out = record(dry)
inscribe(out)
```